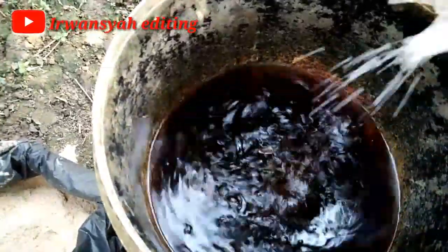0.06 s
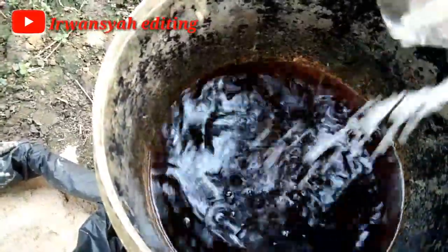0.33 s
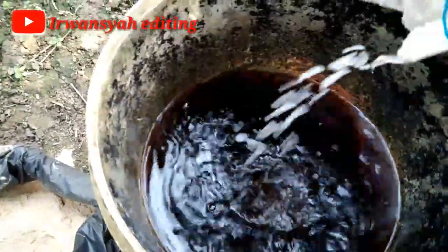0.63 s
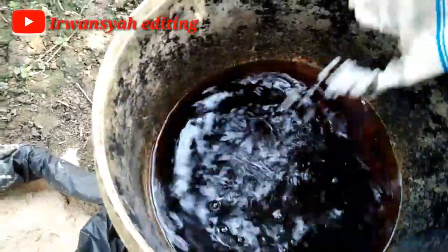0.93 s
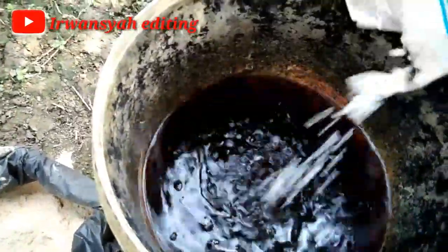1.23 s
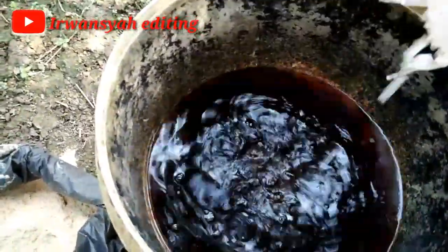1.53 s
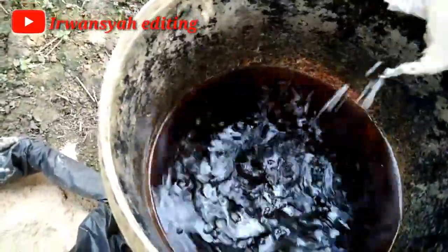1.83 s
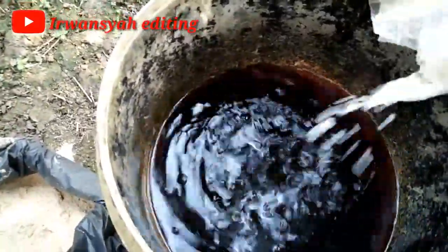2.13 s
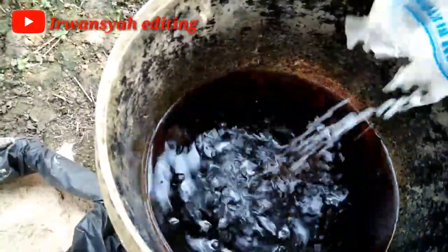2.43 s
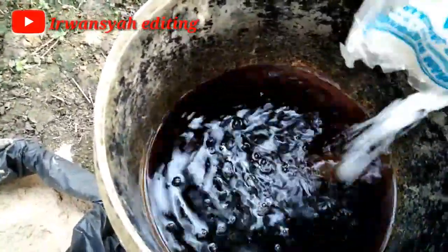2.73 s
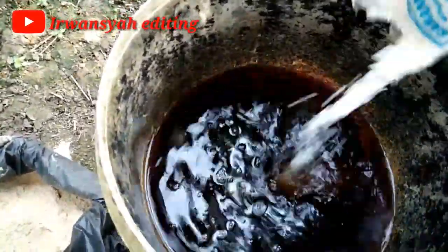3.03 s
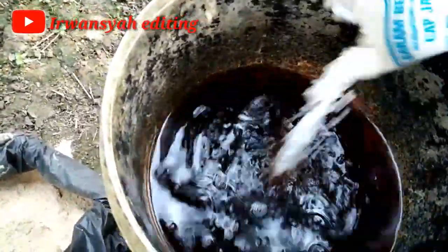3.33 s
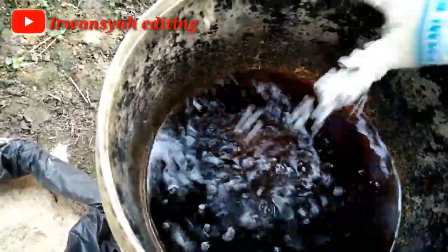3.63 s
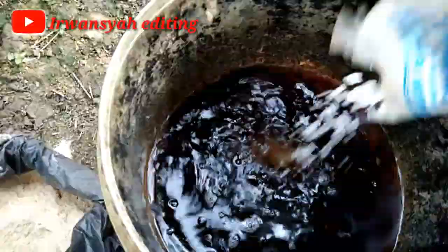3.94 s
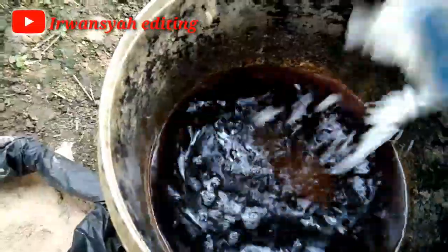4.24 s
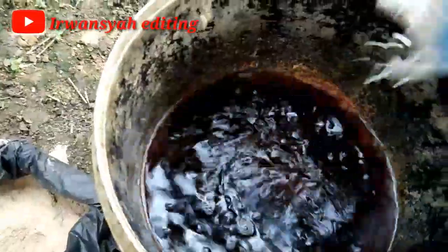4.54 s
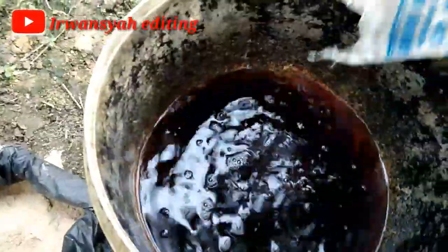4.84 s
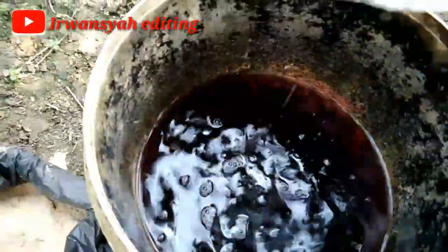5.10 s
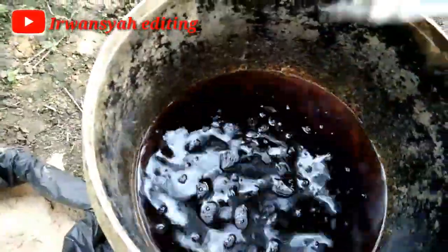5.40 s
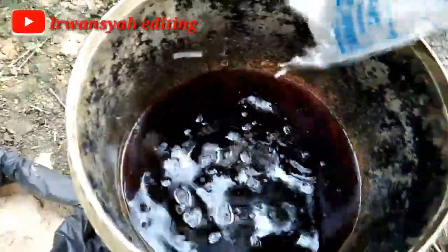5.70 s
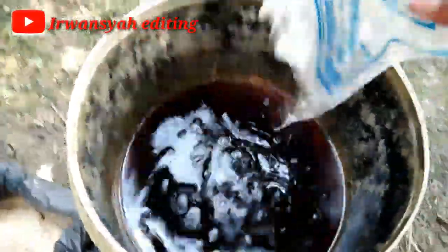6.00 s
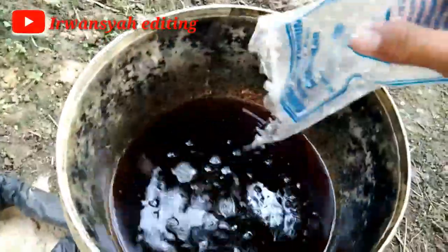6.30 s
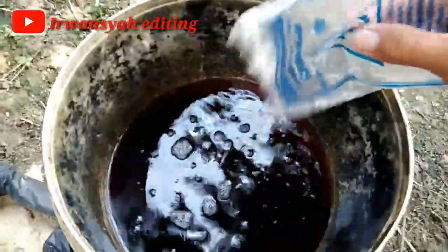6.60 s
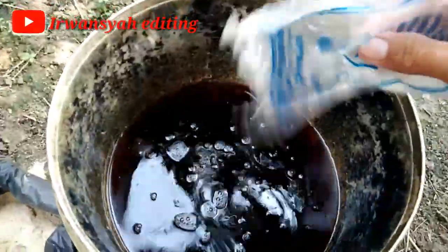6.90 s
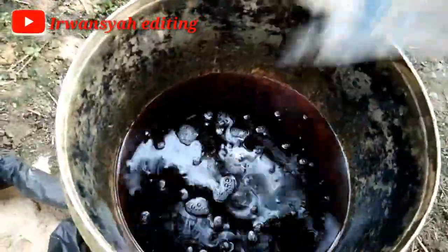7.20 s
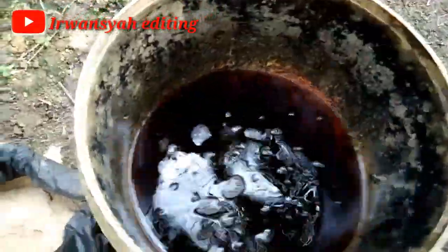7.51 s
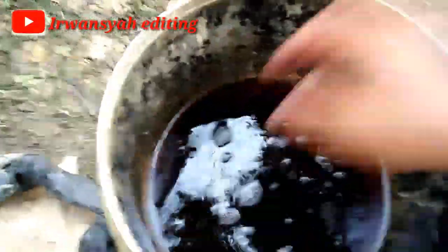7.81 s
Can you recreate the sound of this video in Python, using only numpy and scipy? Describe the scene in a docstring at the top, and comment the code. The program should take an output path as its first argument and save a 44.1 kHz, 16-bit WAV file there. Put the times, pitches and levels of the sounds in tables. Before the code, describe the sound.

Coarse salt patters and splashes in gushes into a bucket of water, then the nearly empty plastic bag is shaken and crackles.

```python
"""A close patter and fizz: coarse salt runs in gushes from a plastic bag into a bucket of water.
Each grain is a tiny impact, clumps slap the surface, and trapped air resonates as bubbles.
From about 4.7 s the nearly empty bag is shaken, some eight times a second, and its film crackles
as it buckles. Beneath lie the low churning of the water, a faint passing hum and outdoor air."""
import sys
import numpy as np
from scipy import signal
from scipy.fft import rfft, irfft, next_fast_len
from scipy.io import wavfile
from scipy.ndimage import uniform_filter1d, map_coordinates

SR = 44100
rng = np.random.default_rng(int(sys.argv[2]) if len(sys.argv) > 2 else 0)


def waveform_to_disk(signal):
    """Save audio, clipped to [-1, 1], as 16-bit WAV at the path in sys.argv[1]."""
    frames = np.transpose(np.atleast_2d(signal))
    scaled = np.clip(frames, -1, 1) * 32767
    samples = np.round(scaled).astype(np.int16)
    wavfile.write(sys.argv[1], SR, samples)


N = 350595

# the biggest clumps that hit the water: start_s, size_db, slap_offset_db, tick_offset_db
SALT_CLUMPS = [(0.263, -20.5, -14, -14.5), (0.364, -12.5, -17.5, -15), (0.408, -17, -14, -18),
               (0.595, -19, -14.5, -14), (0.767, -18, -24, -17), (0.89, -21.5, -13.5, -17.5),
               (0.997, -17, -18, -13), (1.021, -11, -20.5, -19), (1.052, -15.5, -13.5, -11.5),
               (1.219, -20, -15.5, -16), (1.351, -30.5, -17.5, -9.5), (1.395, -21, -30, -11.5),
               (1.423, -21.5, -19.5, -12), (1.5, -28.5, -10.5, -15.5), (1.577, -14.5, -40.5, -8),
               (1.863, -19.5, -13, -30.5), (1.884, -24, -9.5, -18.5), (1.972, -21, -15, -13),
               (1.981, -23, -13.5, -13), (2.051, -17, -21.5, -16), (2.082, -26, -7.5, -16.5),
               (2.165, -28, -12, -14), (2.289, -28.5, -13, -13), (2.326, -17, -16.5, -19),
               (2.39, -19.5, -14.5, -15), (2.83, -18.5, -22, -14), (2.981, -19.5, -10, -16.5),
               (3.191, -20.5, -13.5, -9), (3.22, -14.5, -15, -12), (3.29, -19, -14, -21.5),
               (4.034, -19.5, -23.5, -9.5), (4.078, -12.5, -22, -9.5), (4.413, -13, -17, -17),
               (4.611, -22.5, -11, -20)]
# spectrum of the finest ticks, with the microphone's resonance near 10 kHz: frequency_hz, gain_db
TICK_SPECTRUM = [(2500, -35), (5500, -12), (8300, -6.5), (10250, -0.5), (11400, -4), (13000, -14),
                 (16000, -20.5)]


def salt(splash_db, fizz_db, lag_s=.0017):
    """Impact noise: grains and clumps strike the water, merging into a wash as the stream thickens."""
    # spectrum of the water's splash: frequency_hz, gain_db
    splash_spectrum = [(100, -24), (250, -4.5), (370, -2), (480, -7.5), (850, -2.5), (1300, -0.5),
                       (2300, -1.5), (4000, -4.5), (7000, -11), (11000, -15.5), (16000, -33.5)]
    grain_rate = 5400 * amp(.95 * (splash_db + 44))
    spray_rate = 4300 * amp(.44 * (fizz_db + 45))
    grains = patter(grain_rate, spread_db=6, cluster_db=2.5, cluster_rate=150, wash=.24)
    spray = patter(spray_rate, spread_db=8.5, cluster_db=6, cluster_rate=150, wash=.43)
    slap = pitched(grains * amp(splash_db - 1.2), q=2.6, click_share=.18)
    tick = pitched((.76 * grains + .59 * spray) * amp(fizz_db + 1.27), q=2.6, click_share=.27)
    for start_s, size_db, slap_offset_db, tick_offset_db in SALT_CLUMPS:
        add(slap, start_s + lag_s, amp(size_db + slap_offset_db + 20) * impact(t60=.0087))
        add(tick, start_s + lag_s, amp(size_db + tick_offset_db + 20.5) * impact(t60=.008))
    # smaller lumps: more and bigger in a thicker stream
    crumbs = random_events(8 * amp(.5 * (splash_db + 44)))
    for i, sizes in zip(crumbs, rng.standard_normal((len(crumbs), 2))):
        mean_db = -14 + .41 * (splash_db[i] + 50)
        for track, size in zip((slap, tick), sizes):
            add(track, i / SR, amp(mean_db + 2 * size) * impact(t60=.008))
    return colour(slap, splash_spectrum) + colour(tick, TICK_SPECTRUM)


def salt_flow(rise_s=.051, fall_s=.089, empty_s=4.68):
    """Incoherent sources add in power: overlapping gushes give the splash and fizz envelopes in dB."""
    # gushes from the tipped bag: start_s, length_s, splash_db, fizz_offset_db
    gushes = [(0.0, 0.46, -43.5, -1), (0.492, 0.17, -44, -4), (0.577, 0.027, -41.5, -3),
              (0.737, 0.25, -50.5, -2), (0.897, 0.036, -48, -1.5), (.985, 0.25, -40, -7),
              (1.397, 0.051, -55.5, 0.5), (1.533, 0.052, -52, 1), (1.696, .29, -49.5, -5),
              (2.06, .15, -55, -5.5), (2.371, .16, -48, -2.5), (2.566, .12, -41, -6),
              (2.715, 0.086, -42.5, -1.5), (2.837, 0.18, -46, -2.5), (3.03, 0.077, -53.5, 1),
              (3.122, .19, -45, -2), (3.334, .08, -43, 0), (3.509, 0.095, -45.5, 2),
              (3.705, 0.098, -46.5, 2), (3.883, 0.073, -47.5, 5), (4.078, 0.072, -42, 1.5),
              (4.246, 0.17, -44.5, .5), (4.529, 0.019, -49, -2.5), (4.62, .03, -57, -0.5)]
    splash, fizz = np.zeros(N), np.zeros(N)
    for start_s, length_s, splash_db, fizz_offset_db in gushes:
        gush = swell(start_s, length_s, rise_s, fall_s)
        stragglers = amp(-10.5) * swell(start_s, length_s, rise_s, fall_s=.33)
        power = (amp(splash_db) * np.maximum(gush, stragglers)) ** 2
        splash += power
        fizz += power * amp(fizz_offset_db) ** 2
    running = swell(0, empty_s, rise_s, fall_s) ** 2
    return 10 * np.log10(np.array([splash, fizz]) * running + 1e-14)


def bag(lag_s=.0017):
    """Buckling: each shake snaps creases in the film, while the whole sheet fans the air."""
    # single snaps that stand out, from loud cracks to faint ticks in the pauses:
    # start_s, size_db, crack_offset_db, tick_offset_db
    snaps = [(4.739, -26.5, -18, -13.5), (4.952, -34, -9.5, -11), (5.058, -44.5, -23, -11.5),
             (5.331, -25, -15.5, -15), (5.338, -23, -19, -14.5), (5.405, -28, -20, -10.5),
             (5.458, -29.5, -7, -10.5), (5.498, -16, -13.5, -15.5), (5.534, -12, -11.5, -23),
             (5.564, -15.5, -15.5, -18.5), (5.709, -19.5, -13, -17), (5.731, -21, -11.5, -12),
             (5.87, -11, -23, -13), (5.875, -11, -21.5, -12.5), (5.893, -16.5, -16.5, -18),
             (5.973, -22, -13, -16), (6.094, -15, -17, -17), (6.113, -10, -23, -12.5),
             (6.359, -15, -20, -15.5), (6.385, -16, -23, -12.5), (6.783, -11.5, -18, -18),
             (7.018, -13.5, -18.5, -15), (7.126, -17.5, -16, -18.5), (7.252, -39.5, -11, -12),
             (7.282, -30.5, -10.5, -17), (7.712, -32, -14.5, -17.5), (7.917, -23.5, -12.5, -16.5)]
    # spectrum of the crackling film: frequency_hz, gain_db
    film_spectrum = [(100, -19.5), (260, -4.5), (370, 2.5), (480, -6), (750, -4), (1000, -1), (1600, -1),
                     (2300, 1), (2950, -2), (3500, -1), (5000, -5), (8000, -10), (16000, -32)]
    # spectrum of the flapping sheet: frequency_hz, gain_db
    flap_spectrum = [(25, -37), (45, -32.5), (70, -12.5), (90, 3), (112, -3.5), (165, 2), (250, -2.5),
                     (370, -8.5), (500, -16.5), (1200, -43)]
    flex = bag_flex()
    firmness = flex / amp(-36)
    # gentle flexing trips only a few dull creases, a hard shake many bright ones
    force = firmness + .0088
    crackle = flex * patter(3200 * force ** .6, spread_db=5.5, cluster_db=4, cluster_rate=190, wash=.28)
    crack = pitched(amp(-1.14) * crackle, q=2.4, click_share=.46)
    tick = amp(-3.5) * force ** .12 * scatter(crackle)
    for start_s, size_db, crack_offset_db, tick_offset_db in snaps:
        add(crack, start_s + lag_s, amp(size_db + crack_offset_db + 20) * impact(t60=.0038))
        add(tick, start_s + lag_s, amp(size_db + tick_offset_db + 21) * impact(t60=.015))
    for i in random_events(20 * np.sqrt(firmness)):  # random snaps, more in a firm shake
        for track in (crack, tick):
            add(track, i / SR, amp(rng.normal(-12.5, 3.1)) * force[i] ** .62 * impact(t60=.005))
    flap = colour(flex * force ** -.1 * rng.standard_normal(N), flap_spectrum)
    return colour(crack, film_spectrum) + colour(tick, TICK_SPECTRUM) + amp(-12.5) * flap


def bag_flex(rise_share=.52, rustle_stretch=2.1):
    """Power summation: the shakes and the slack film's longer rustle form one amplitude envelope."""
    # shakes of the nearly empty bag: peak_s, level_db, length_s (between the -20 dB points)
    shakes = [(4.764, -42.5, 0.11), (4.828, -46, 0.12), (4.914, -55, 0.084), (4.983, -42, .075),
              (5.319, -57.5, 0.16), (5.42, -66, 0.066), (5.505, -34.5, 0.067), (5.545, -38, 0.13),
              (5.596, -35.5, .1), (5.645, -32.5, .085), (5.766, -33.5, .13), (5.886, -30, 0.12),
              (6.014, -33.5, 0.13), (6.118, -32.5, .085), (6.16, -43, 0.14), (6.262, -33.5, 0.14),
              (6.364, -28.5, .065), (6.401, -34.5, 0.072), (6.499, -31.5, 0.12), (6.605, -27.5, .06),
              (6.718, -37.5, 0.13), (6.819, -32, 0.069), (6.864, -35, 0.11), (6.955, -37, 0.15),
              (7.07, -31.5, 0.1), (7.18, -36, 0.083), (7.288, -46, 0.067), (7.711, -59, .04),
              (7.928, -42.5, 0.043)]
    power = np.zeros(N)
    for peak_s, level_db, length_s in shakes:
        rise_s, fall_s = rise_share * length_s, (1 - rise_share) * length_s
        shake = swell(peak_s, 0, rise_s, fall_s)
        rustle = amp(-15) * swell(peak_s, 0, rustle_stretch * rise_s, rustle_stretch * fall_s)
        power += (amp(level_db) * np.maximum(shake, rustle)) ** 2
    return np.sqrt(power)


def bubbles(splash_db, plink_cycles=72, plink_share=.025):
    """Minnaert resonance: trapped air is a spring loaded by water; big bubbles ring lower and longer."""
    # the bubbles that ring out most clearly: start_s, pitch_hz, level_db
    plinks = [(.073, 891, -28), (.408, 1164, -32.5), (1.397, 2112, -38.5), (1.424, 5150, -27.5),
              (1.451, 1100, -37.5), (1.537, 1940, -39.5), (1.744, 6800, -27.5), (1.866, 2080, -28.5),
              (2.213, 1830, -41), (2.393, 1544, -33), (2.51, 1370, -32), (3.138, 3523, -29),
              (3.225, 765, -39.5), (3.251, 1173, -32), (3.296, 970, -35.5), (3.447, 2470, -30),
              (3.555, 4368, -27), (3.625, 2895, -29), (3.658, 4850, -29.5), (3.709, 1300, -23),
              (3.752, 3700, -25), (3.777, 1540, -30), (3.986, 1524, -32.5), (4.08, 1549, -34),
              (4.158, 1120, -38.5), (4.192, 2138, -35.5), (4.252, 2140, -32), (4.299, 1080, -33),
              (4.396, 2954, -27), (4.438, 4950, -28.5)]
    # air dragged under by the salt: time_s, bubbles_per_s
    aeration = [(0, 187.5), (1.5, 244), (1.7, 106), (2.3, 100), (2.5, 233), (3.1, 222), (3.5, 518),
                (4.4, 429), (4.7, 48)]
    water = np.zeros(N)
    for start_s, pitch_hz, level_db in plinks:
        add(water, start_s, amp(level_db - .3) * bubble(pitch_hz, plink_cycles, glide=.016))
    births = random_events(np.interp(clock(), *np.transpose(aeration), right=0))
    for i, (smallness, strength, life, luck) in zip(births, rng.random((len(births), 4))):
        pitch_hz = 1800 * 4.8 ** smallness
        if luck < plink_share:  # now and then a small bubble stands out over the splash
            level_db = splash_db[i] + 9.5 + 5 * strength
            cycles = plink_cycles
        else:
            level_db = np.clip(splash_db[i], -53, -45) - 4.5 + 19.5 * strength ** 3
            cycles = 18 + 45 * life
        add(water, i / SR, amp(level_db) * bubble(pitch_hz, cycles, glide=.05))
    return water


def plops(centre_hz=1220, spread_octaves=.38, lag_s=.003):
    """Cavity resonance: each clump punches a hollow in the water that rings briefly as it closes."""
    water = np.zeros(N)
    for start_s, size_db, slap_offset_db, _ in SALT_CLUMPS:
        pitch_hz = centre_hz * 2 ** rng.normal(0, spread_octaves)
        ring = bubble(pitch_hz, cycles=16, glide=.05)
        add(water, start_s + lag_s, amp(size_db + slap_offset_db - 2) * ring)
    return water


def bubble(pitch_hz, cycles, glide):
    """A damped oscillator, 60 dB down after the given cycles; its pitch rises as it nears the surface."""
    t60 = cycles / pitch_hz
    t = np.arange(int(t60 * SR) + 2) / SR
    return np.sin(2 * np.pi * pitch_hz * t * (1 + glide * t / t60)) * amp(-60 * t / t60)


def bucket(direct, wall_gain, wet_db, t60, frame=1024):
    """Reflection: a wall echo and a diffuse tail, varied at random as the salt and the bag move about."""
    reflected = np.zeros(N)
    t = np.arange(frame * 2) / SR
    fade = signal.get_window("hann", frame)
    padded = np.pad(direct, (0, frame))
    for i in range(0, N, frame // 2):
        tail = rng.standard_normal(len(t)) * amp(-60 * t / t60) * (t > .002)
        response = amp(wet_db) * tail / np.linalg.norm(tail)
        wall_delay_s = rng.uniform(.001, .0035)
        response[int(wall_delay_s * SR)] += wall_gain
        add(reflected, i / SR, signal.fftconvolve(padded[i:i + frame] * fade, response))
    return amp(-.8) * (direct + reflected)


def churn():
    """Forced vibration: stirred water heaves and booms against the bucket, settling after the pour."""
    # strength of the churning: time_s, level_db
    heave = [(0.0, -55.5), (1.2, -53.5), (1.33, -60), (2.2, -55.5), (2.28, -68.5), (2.45, -55),
             (3.6, -58.5), (4.95, -62), (5.2, -85.5)]
    # spectrum of the water and bucket booming: frequency_hz, gain_db
    churn_spectrum = [(25, -40.5), (45, -25.5), (62, -12), (75, -9.5), (91, 5), (110, -2), (178, -1.5),
                      (240, -6), (360, -9), (500, -22.5), (1200, -47.5)]
    level_db = np.interp(clock(), *np.transpose(heave), right=-120)
    return amp(level_db) * colour(rng.standard_normal(N), churn_spectrum)


def hum(pitch_hz=178, waver=.05):
    """Random modulation: a faint low tone wavers in pitch and level while the stream is thin."""
    # rise and fall of the hum: time_s, level_db
    contour = [(1.1, -69), (1.35, -59.5), (2.1, -58), (2.6, -61), (2.9, -74.5)]
    phase = 2 * np.pi * np.cumsum(pitch_hz * (1 + waver * wobble(15))) / SR
    level_db = np.interp(clock(), *np.transpose(contour), left=-120, right=-120)
    return amp(level_db + 3 * wobble(12)) * np.sin(phase)


def outdoor_air():
    """Stationary noise: a faint, steady background, strongest in the bass."""
    # spectrum of the open air: frequency_hz, gain_db
    air_spectrum = [(25, -27.5), (50, -19.5), (62, -0.5), (90, -5), (130, -1), (220, -7.5), (370, -8),
                    (480, -19), (950, -19.5), (1150, -14.5), (2500, -26.5), (6500, -31), (9500, -27.5),
                    (12000, -35.5), (16000, -44.5)]
    return amp(-78) * colour(rng.standard_normal(N), air_spectrum)


def patter(rate, spread_db, cluster_db, cluster_rate, wash):
    """Shot noise: tiny uneven impacts, swelling in clusters over a wash of finer ones; rms near 1."""
    hits = rng.random(N) < rate / SR
    sizes = rng.choice([-1, 1], N) * amp(spread_db * np.minimum(rng.standard_normal(N), 2))
    grains = unit_rms(hits * sizes) + wash * rng.standard_normal(N)
    grains *= amp(cluster_db * wobble(cluster_rate))
    power = uniform_filter1d(uniform_filter1d(grains ** 2, size=900), size=900)
    return grains / np.sqrt(np.abs(power) + 1e-9)


def pitched(pulses, q, click_share, bands=12):
    """Damped resonance: each pulse rings briefly at a random pitch; part of its power stays a click."""
    band = rng.integers(bands, size=N)
    rings = np.zeros(N)
    for k, pitch_hz in enumerate(np.geomspace(260, 14000, bands)):
        rings += signal.lfilter(*signal.iirpeak(pitch_hz, q, fs=SR), pulses * (band == k))
    rings = unit_rms(rings) * np.std(pulses)
    return np.sqrt(1 - click_share) * rings + np.sqrt(click_share) * scatter(pulses)


def impact(t60):
    """A broadband transient of energy 1: a sharp pulse whose scratchy tail decays exponentially."""
    t = np.arange(SR // 50) / SR
    burst = rng.standard_normal(len(t)) * amp(-60 * t / t60)
    burst[0] = 2
    return burst / np.linalg.norm(burst)


def scatter(pulses):
    """Decorrelation: the same pulses with random polarities."""
    return pulses * rng.choice([-1, 1], len(pulses))


def colour(sound, spectrum, size=8192):
    """Minimum-phase filtering to a (frequency_hz, gain_db) shape; white noise keeps its power."""
    frequency_hz, gain_db = np.transpose(spectrum)
    grid_hz = np.fft.rfftfreq(size, 1 / SR)
    gain = amp(np.interp(np.log(grid_hz + 1), np.log(frequency_hz), gain_db))
    cepstrum = irfft(np.log(gain))
    cepstrum[1:size // 2] *= 2  # folding onto positive time makes the filter causal
    cepstrum[size // 2 + 1:] = 0
    response = irfft(np.exp(rfft(cepstrum)))
    return signal.fftconvolve(sound, response / np.linalg.norm(response))[:N]


def swell(start_s, hold_s, rise_s, fall_s):
    """Exponential growth up to start_s, a hold, then decay; rise_s and fall_s each span 20 dB."""
    t = clock()
    decades_down = np.maximum((start_s - t) / rise_s, (t - start_s - hold_s) / fall_s)
    return amp(-20 * np.clip(decades_down, 0, 10))


def random_events(rate):
    """A Poisson process: sample numbers of events at the given mean rate per second."""
    return np.flatnonzero(rng.random(N) < rate / SR)


def wobble(rate):
    """Slow noise: a smooth curve through rate random knots a second."""
    return map_coordinates(rng.standard_normal(int(N * rate / SR) + 4), [clock() * rate])


def add(track, start_s, sound):
    """Superposition: mix a sound into a track from start_s on."""
    part = track[max(round(start_s * SR), 0):][:len(sound)]
    part += sound[:len(part)]


def amp(db):
    return 10 ** (np.asarray(db) / 20)


def unit_rms(x):
    return x / np.sqrt(np.mean(x ** 2) + 1e-20)


def clock():
    return np.arange(N) / SR


def scene():
    """Superposition: salt and bag echo in the bucket and add to the water, the hum and the air."""
    splash_db, fizz_db = salt_flow()
    air = outdoor_air()
    inside = bucket(salt(splash_db, fizz_db) + bag(), wall_gain=.36, wet_db=-12, t60=.045)
    return (inside + churn() + hum() + bubbles(splash_db) + plops() + air)[None]


def record(dry):
    """Band limiting: an ideal low-pass filter removes the highest treble."""
    cutoff_hz = 15800
    size = next_fast_len(N + SR // 2)
    passband = np.fft.rfftfreq(size, 1 / SR) < cutoff_hz
    return irfft(rfft(dry, size) * passband, size)[:, :N]


dry = scene()
out = record(dry)
waveform_to_disk(out)
```